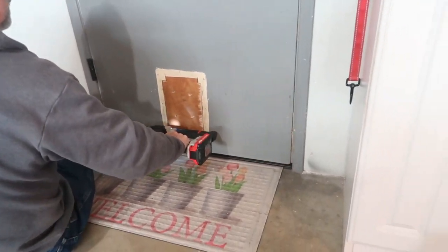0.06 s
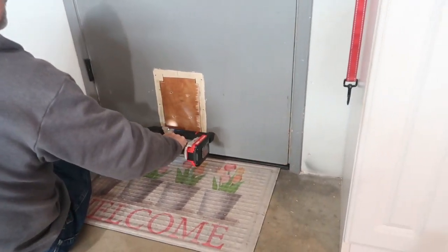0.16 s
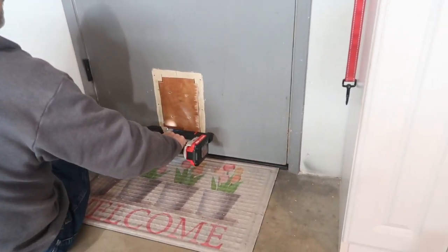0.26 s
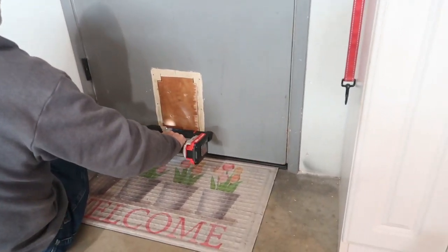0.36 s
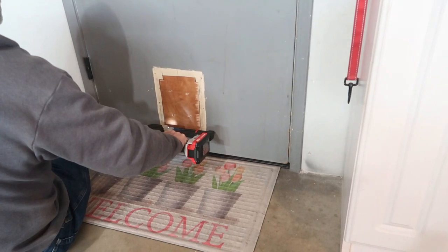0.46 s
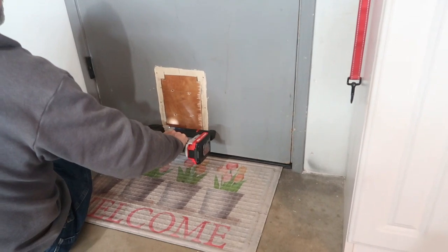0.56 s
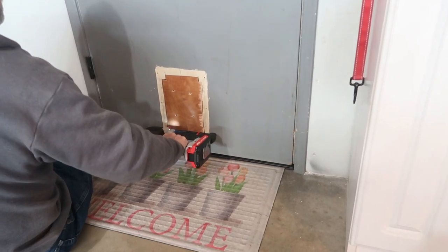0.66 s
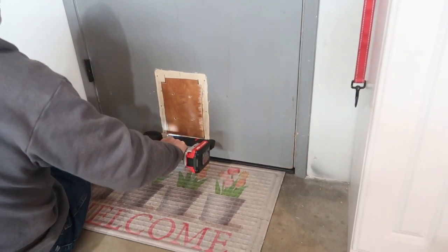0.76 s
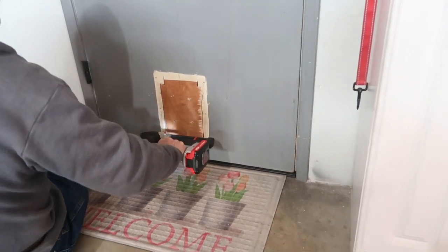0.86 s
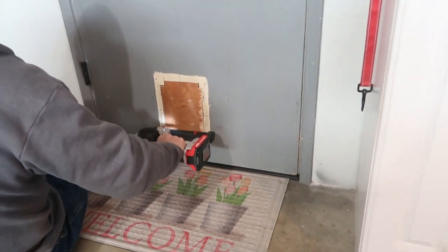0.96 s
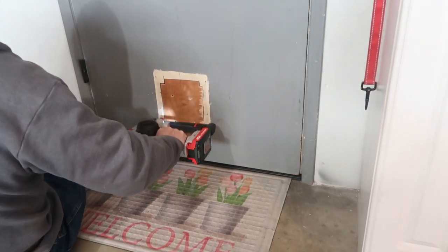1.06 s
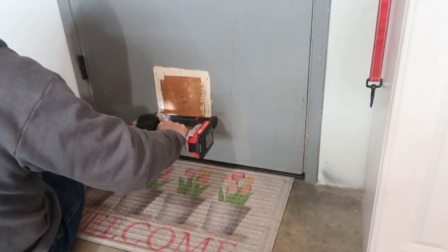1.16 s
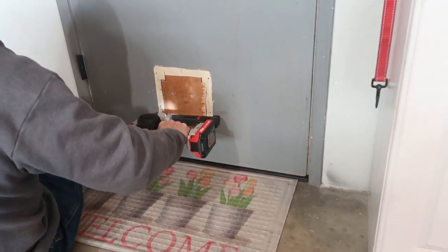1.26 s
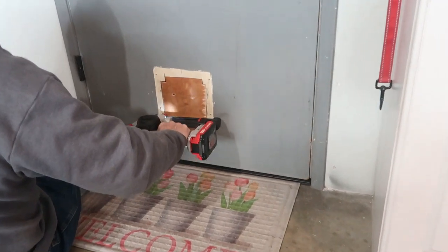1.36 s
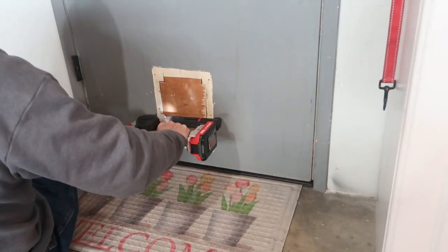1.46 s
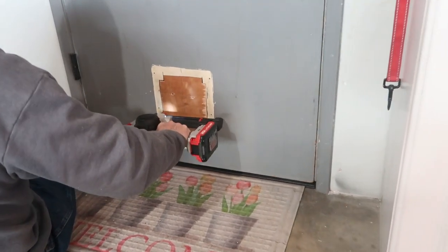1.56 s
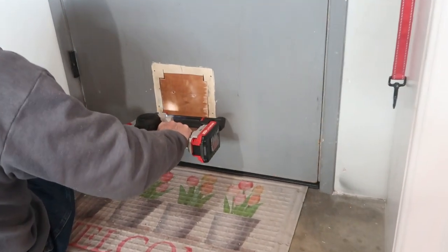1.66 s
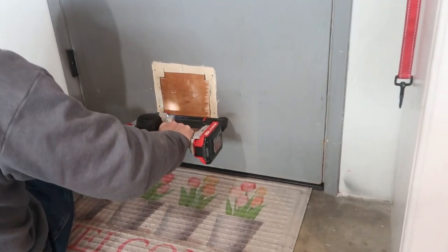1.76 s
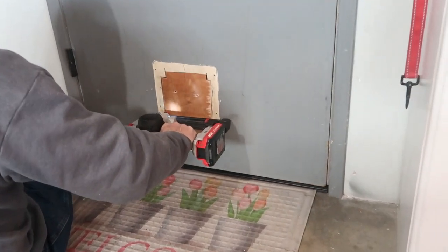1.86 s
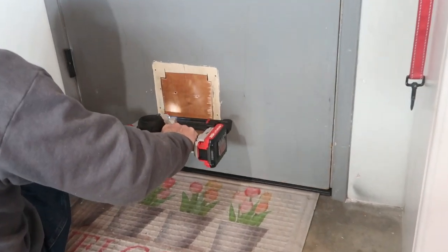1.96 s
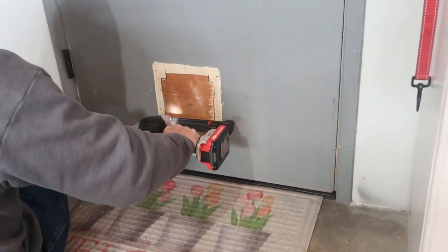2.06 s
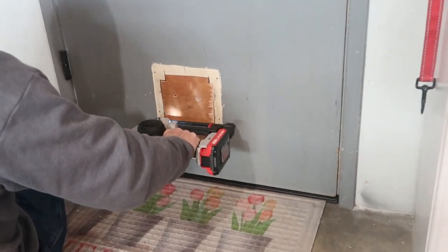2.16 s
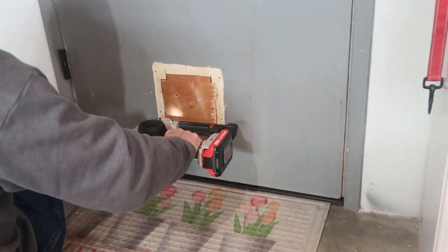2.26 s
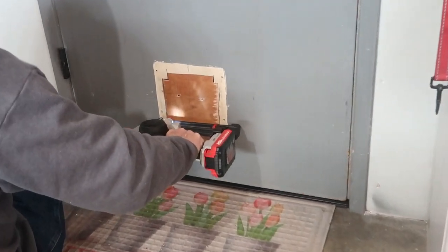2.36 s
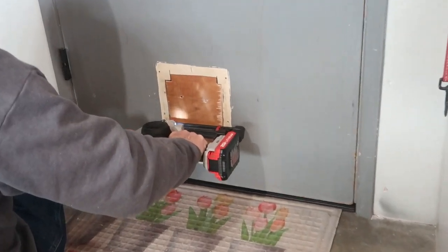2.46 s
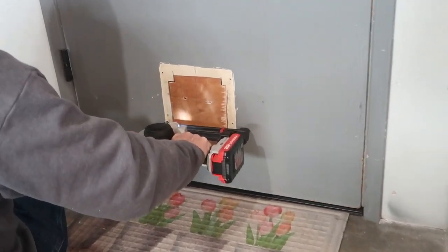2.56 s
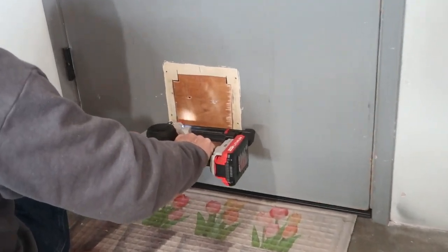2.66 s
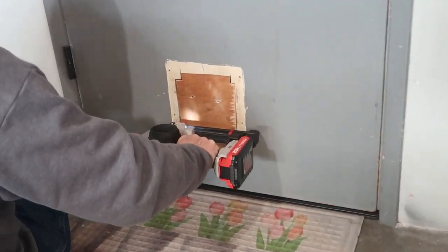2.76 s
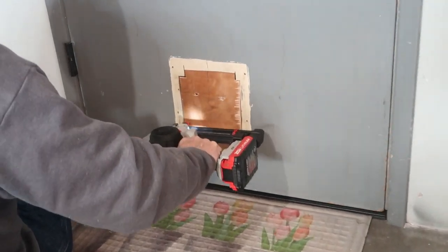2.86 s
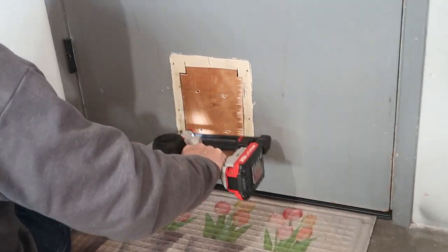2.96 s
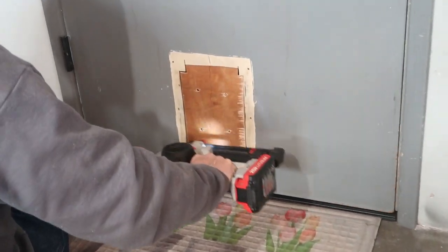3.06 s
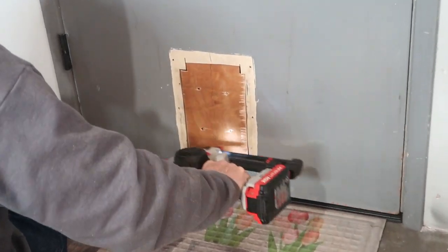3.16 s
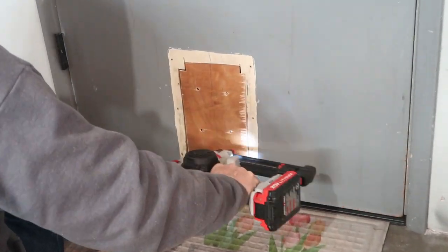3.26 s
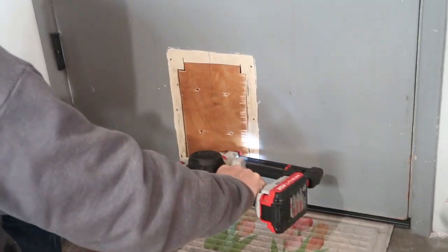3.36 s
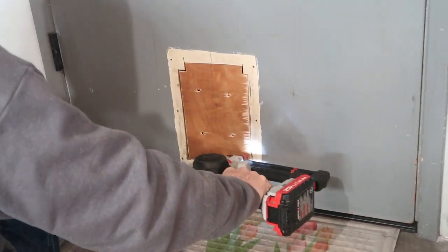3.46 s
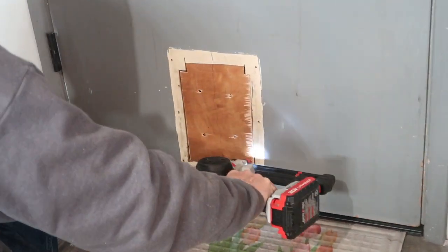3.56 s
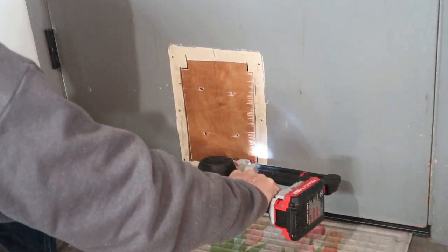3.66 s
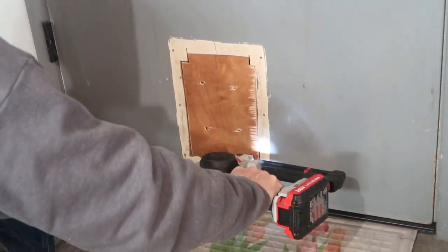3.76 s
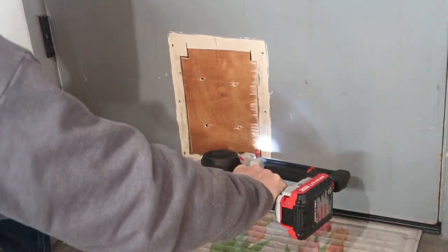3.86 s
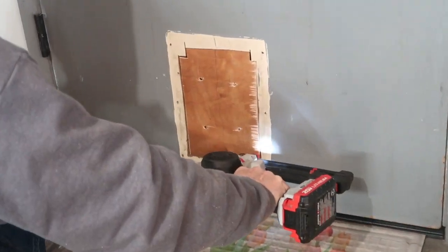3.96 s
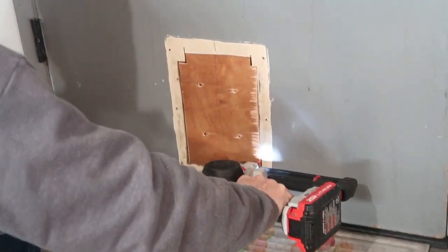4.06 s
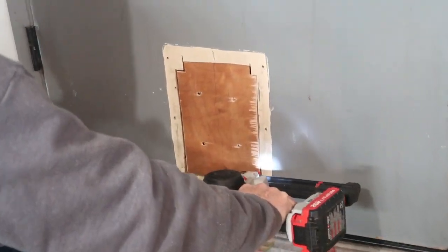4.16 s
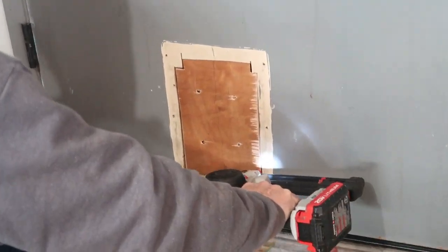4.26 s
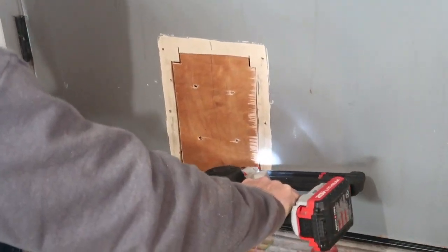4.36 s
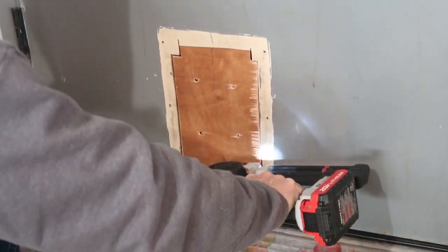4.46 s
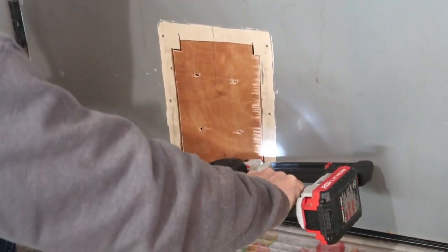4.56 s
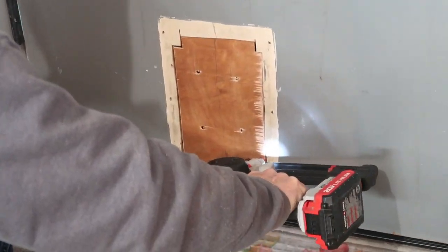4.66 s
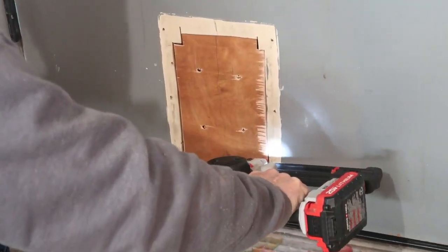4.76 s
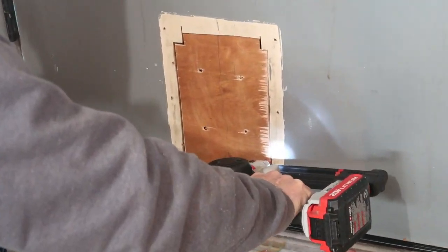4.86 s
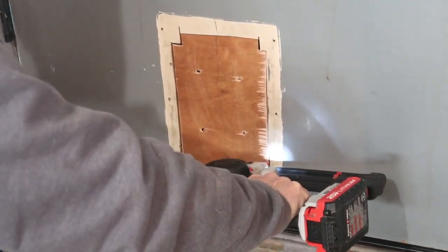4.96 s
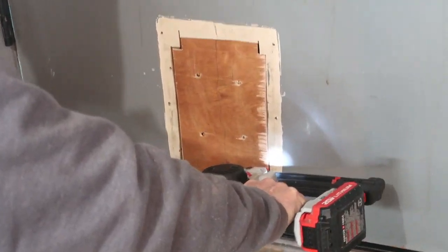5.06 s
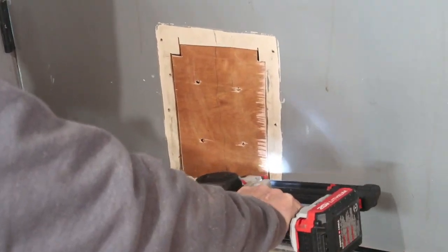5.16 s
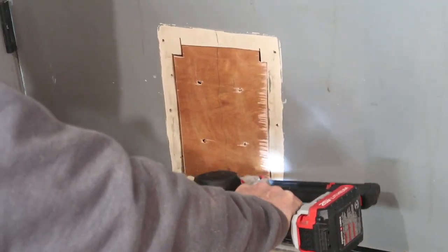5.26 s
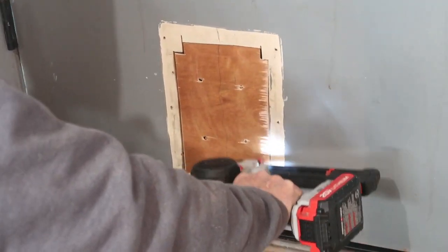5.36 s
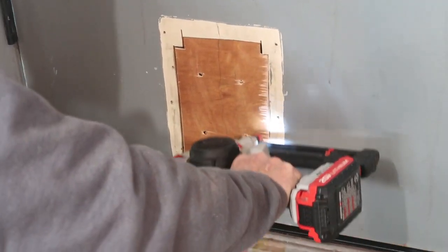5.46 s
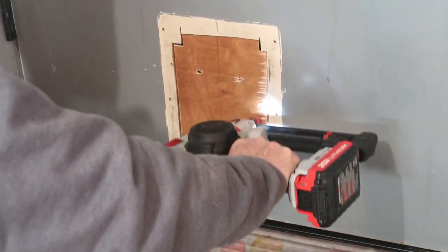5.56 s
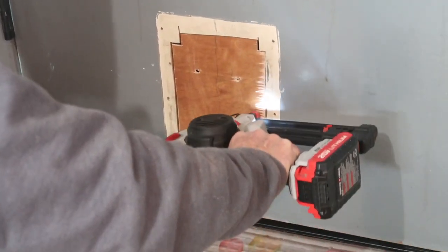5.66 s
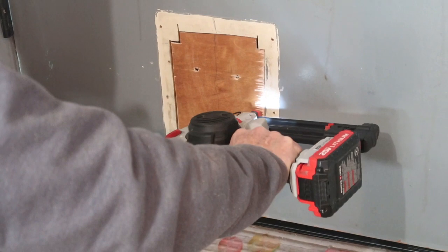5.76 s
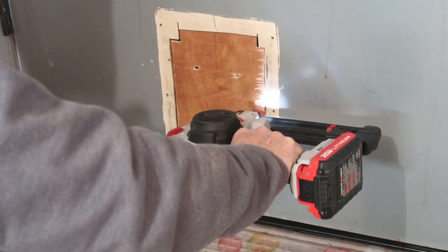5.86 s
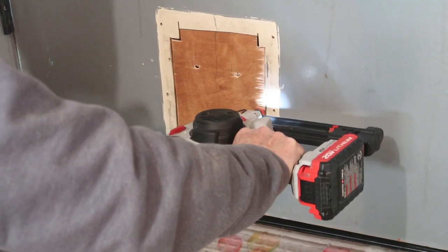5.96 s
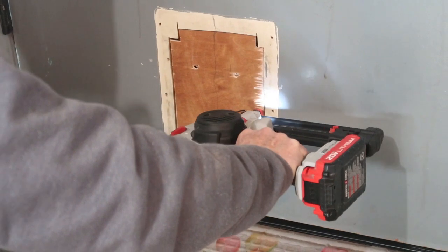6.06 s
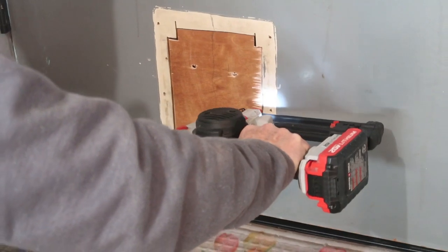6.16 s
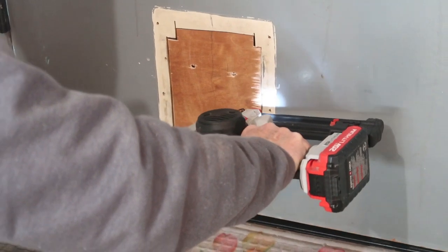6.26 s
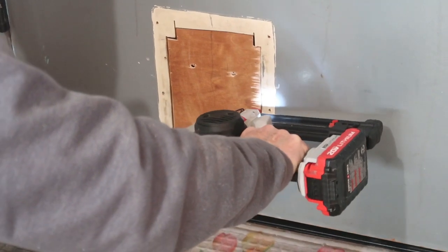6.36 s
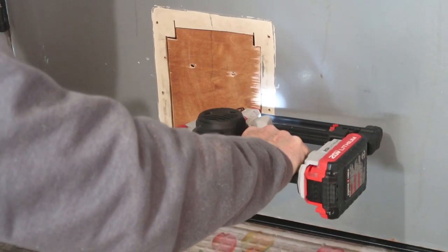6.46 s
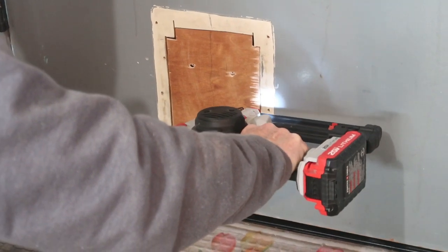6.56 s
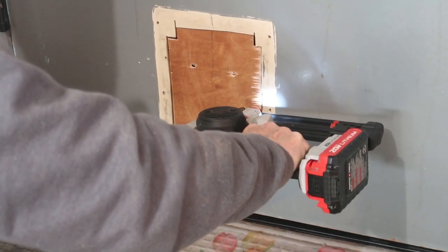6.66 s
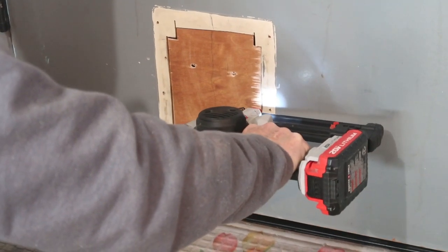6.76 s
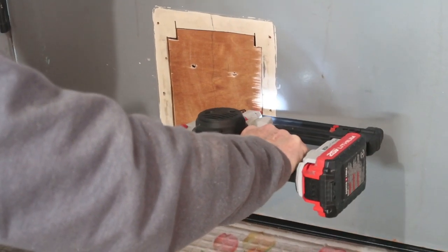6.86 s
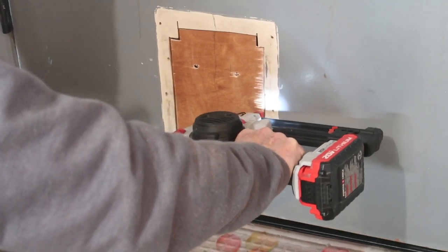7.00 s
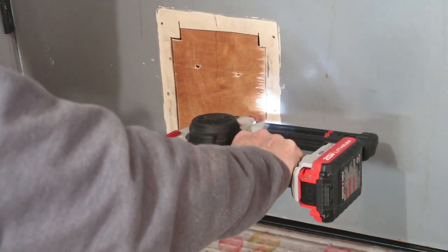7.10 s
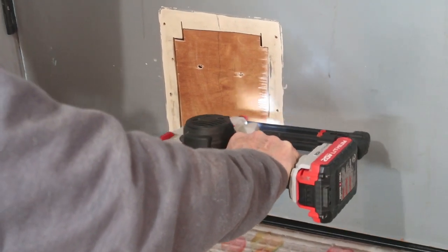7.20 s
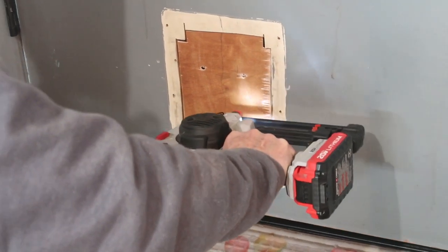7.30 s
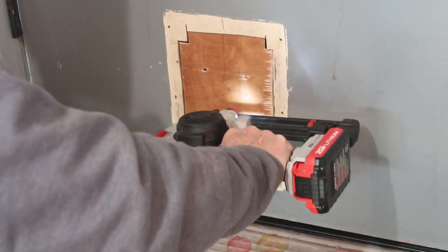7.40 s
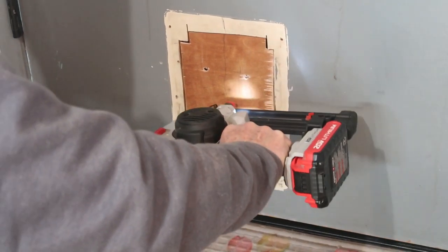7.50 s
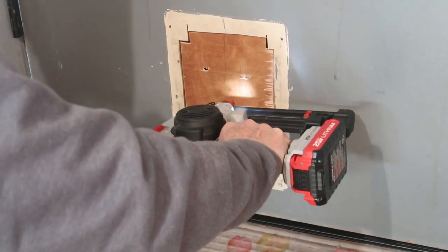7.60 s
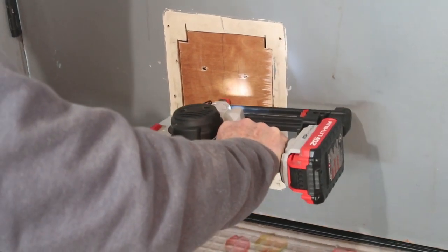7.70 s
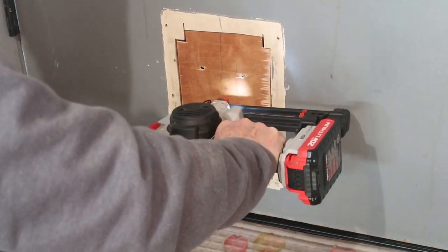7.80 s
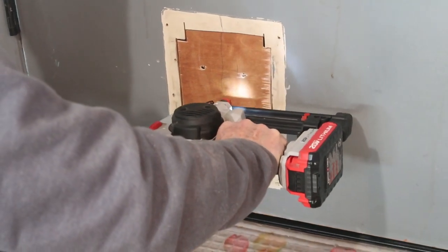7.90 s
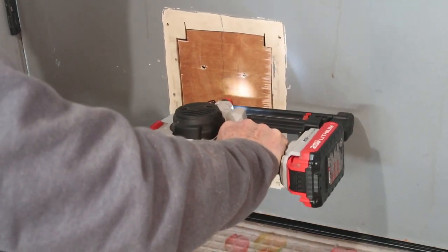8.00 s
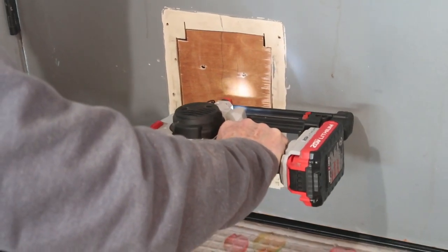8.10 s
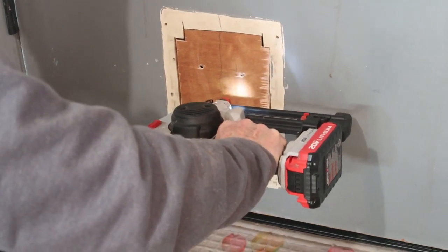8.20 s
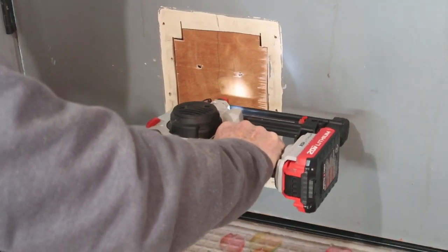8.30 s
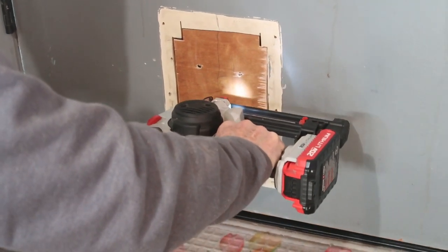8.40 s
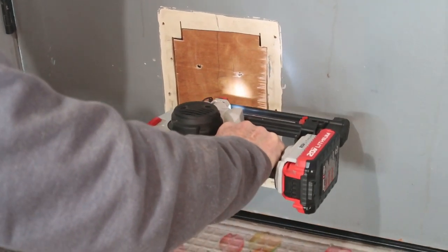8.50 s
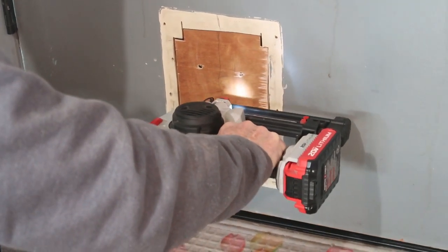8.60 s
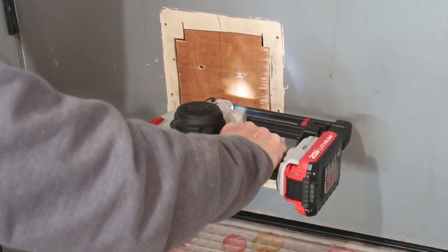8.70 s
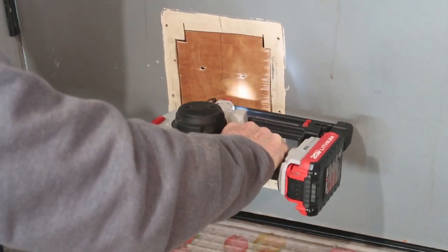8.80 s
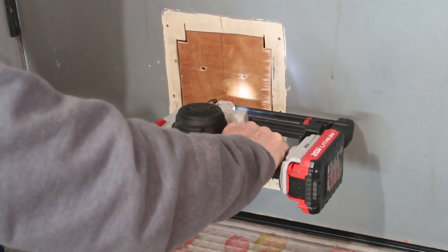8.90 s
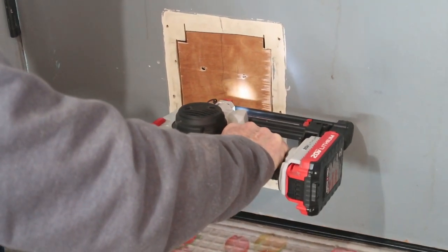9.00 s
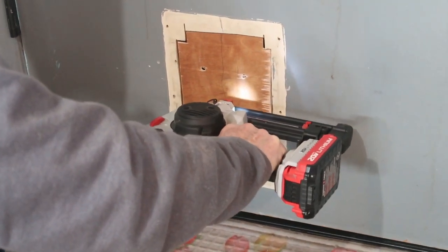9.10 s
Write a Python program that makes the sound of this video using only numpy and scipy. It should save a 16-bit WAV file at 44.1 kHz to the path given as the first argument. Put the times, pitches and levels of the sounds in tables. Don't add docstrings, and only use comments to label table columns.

```python
import sys
import numpy as np
from scipy import signal
from scipy.fft import rfft, irfft, next_fast_len
from scipy.io import wavfile

SR = 44100
rng = np.random.default_rng(int(sys.argv[2]) if len(sys.argv) > 2 else 0)


def persist_wave(psi):
    counts = np.round(np.clip(psi, -1, 1) * 32767).astype(np.int16)
    wavfile.write(sys.argv[1], SR, np.atleast_2d(counts).T)


def magnitude_from_level(level_db):
    exponent = np.asarray(level_db, float) / 20
    return 10 ** exponent


N = 403074


def evened(x):
    return x / np.sqrt(np.mean(x ** 2) + 1e-20)


def read(points, hz):
    f, value = np.transpose(points)[:2]
    return np.interp(np.log(hz + 1), np.log(f + 1), value)


def add(mix, s, sound):
    part = mix[max(round(s * SR), 0):][:len(sound)]
    part += sound[:len(part)]


def hiss(size, colour):
    fast = next_fast_len(size, True)
    gain = magnitude_from_level(read(colour, np.fft.rfftfreq(fast, 1 / SR)))
    return evened(irfft(rfft(rng.standard_normal(size), fast) * gain, fast)[:size])


def resonate(x, hz, width):
    turn = np.exp(2j * np.pi * np.cumsum(hz * np.ones(len(x))) / SR)
    r = np.exp(-np.pi * width / SR)
    return 2 * (turn * signal.lfilter([1 - r], [1, -r], x / turn)).real


def steep(x, hz, width):
    return evened(resonate(resonate(x, hz, width), hz, width))


def columns(rows):
    s, *cols = np.transpose(rows)
    t = np.arange(s[0], s[-1], 1 / SR)
    return t, signal.windows.tukey(len(t), .06), [np.interp(t, s, c) for c in cols]


def burst(t, at, rise, fall):
    return np.exp(np.where(t < at, (t - at) / rise, (at - t) / fall))


# (frequency [Hz], level [dB per Hz])
AIR_COLOUR = [(12, -36), (20, -7), (59, 3), (109, -5), (196, -4), (392, -5.5), (579, -13.5), (832, -8.5),
              (1070, -15), (2750, -22.5), (3630, -28), (7290, -37.5), (15400, -58.5)]


def garage_air():
    return magnitude_from_level(-62) * hiss(N, AIR_COLOUR)


# (frequency [Hz], t60 [s])
GARAGE_DECAY = [(100, 0.29), (300, 0.23), (1000, 0.29), (3000, .26), (6000, 0.31), (12000, 0.19)]


def garage(x):
    taps, at = np.zeros(SR), np.arange(260, SR - 20, 20)
    taps[at + rng.integers(0, 20, len(at))] = rng.choice([-1., 1.], len(at))
    hz, t, z = signal.stft(taps, SR, nperseg=256)
    decay = magnitude_from_level(-60 * t / read(GARAGE_DECAY, hz)[:, None])
    tail = signal.istft(z * decay, SR, nperseg=256)[1]
    return signal.fftconvolve(x, tail / np.linalg.norm(tail))[:N]


# (time [s], push [dB])
PUSH = [(0, -38), (.17, -57.5), (.7, -52), (.95, -76), (1.45, -75.5), (2.05, -50), (2.7, -47), (3.0, -69),
        (3.5, -64.5), (4.15, -48), (5.0, -45.5), (5.3, -68.5), (5.9, -63.5), (6.25, -53), (6.95, -53.5),
        (7.35, -69), (8.3, -53.5), (9.2, -38)]


def handling():
    t, _, (push_db,) = columns(PUSH)
    size, firm_db = len(t), push_db + 55
    lumps = magnitude_from_level(0.98 * hiss(size, [(1, 1), (30, -18.5), (60, -45), (20000, -89.5)]))
    rumble = hiss(size, [(12, -30), (28, 8.5), (60, 9.5), (140, 6.0), (220, -9), (20000, -84.5)])
    rub = hiss(size, [(90, -36), (180, -3), (420, -2), (520, -12.0), (900, -10), (1600, -30), (20000, -100)])
    rustle = hiss(size, [(700, -51), (1300, 2.5), (3000, -7.5), (4500, -13.0), (9000, -23), (20000, -72)])
    rustle = rustle + 0.17 * steep(rustle, 3200, 45) + 0.06 * steep(rustle, 2800, 81)
    friction = magnitude_from_level(-57.0 + .65 * firm_db) * rub + magnitude_from_level(-66.5 + .7 * firm_db) * rustle
    return t[0], magnitude_from_level(-57 + firm_db) * rumble + lumps * friction


# (time [s], level [dB], pitch [Hz])
MOAN_CURVE = [
    (5.7, -80, 207),
    (5.854, -56, 203),
    (5.886, -62, 199),
    (5.944, -55, 206),
    (5.974, -59, 228),
    (6.05, -56, 230),
]


def moan():
    t, ends, (db, hz) = columns(MOAN_CURVE)
    return t[0], ends * magnitude_from_level(db) * steep(rng.standard_normal(len(t)), hz, 24.3)


# (time [s], level [dB], pitch factor [1])
SWITCH_CLICKS = [(.175, -63.5, 1.09), (0.2237, -55.5, 1.05), (1.2167, -64.5, 1.14), (2.0241, -52, 0.89),
                 (2.2888, -51.5, 1.12), (4.2259, -51, 0.78), (4.639, -49, 1.03), (6.2013, -53.5, .95),
                 (6.449, -52.5, 1.1), (7.811, -53, 1.1), (8.4106, -47, 0.77), (8.7107, -46, 1)]
# (frequency [Hz], width [Hz], level [dB])
SHELL_MODES = [(4170, 1200, 2), (5500, 4500, -2), (7870, 2500, -8.5), (10900, 3300, -15.5)]


def switch(s, db, pitch):
    t = np.arange(0, .08, 1 / SR) - .003
    white = rng.standard_normal(len(t))
    ring = sum(magnitude_from_level(m_db) * steep(white, hz * pitch, w) for hz, w, m_db in SHELL_MODES)
    snap = burst(t, .0015, .001, .003) + .35 * burst(t, .008, .003, .014)
    return s - .003, magnitude_from_level(db - 1.0) * ring * snap


# (time [s], click [dB], click pitch [Hz], wood knock [dB], door thud [dB])
TIP_SCUFFS = [(0.014, -23.5, 3620, -37.5, -38.5), (1.3502, -52.5, 2480, -45, -66),
              (1.3768, -63.5, 2060, -53, -69), (1.6127, -39, 2630, -44, -54), (1.6411, -39, 3860, -53, -61),
              (2.0546, -23.5, 3600, -31.5, -35), (2.8627, -33.5, 2530, -42, -55),
              (3.72, -43.5, 2980, -56, -62), (4.1586, -44, 2150, -54, -52), (4.2715, -34, 4000, -56, -59),
              (4.3202, -52.5, 2180, -43, -68), (6.1503, -53.5, 2420, -48, -48),
              (6.2325, -27.5, 3360, -55, -40), (6.348, -45.5, 2580, -51, -63.5),
              (7.0679, -32.5, 2660, -62, -65), (8.3167, -56, 2390, -41, -61),
              (8.3555, -55, 2850, -32.5, -40)]
NOSE_KNOCKS = [
    (1.5265, -39, 3700, -30.5, -43),
    (3.6606, -40.5, 2480, -49.5, -59),
    (3.9747, -37, 2440, -47, -55),
    (5.964, -45, 2780, -42, -63.5),
    (5.981, -38, 2580, -55, -65),
    (7.8019, -43.5, 2750, -27, -59),
    (7.8407, -26, 2900, -35.5, -54),
    (7.9963, -54, 2750, -49.5, -67.5),
    (8.435, -18, 3100, -25.5, -27.5),
]
SCUFF_SNAP_DB, KNOCK_SNAP_DB = -30.5, -14


def knock(s, click_db, click_hz, wood_db, thud_db, snap_db):
    t = np.arange(0, .25, 1 / SR) - .004
    white = rng.standard_normal(len(t))
    grit = hiss(len(t), [(400, 5.5), (800, 10.0), (3500, 2.5), (6000, -5.5), (9000, -48), (16000, -60)])
    snap = hiss(len(t), [(3500, -25), (6000, 0.5), (10000, -5.5), (14000, -9), (17000, -40)])
    clatter = burst(t, .0015, .0008, .003) + .4 * burst(t, .012, .006, .018)
    click = (evened(grit + 0.64 * steep(white, click_hz, 830)) + magnitude_from_level(snap_db) * snap) * clatter
    wood = np.sin(2 * np.pi * 315 * t) * burst(t, 0.0043, 0.0025, 0.0029)
    plywood = steep(white, 333, 120) + 0.59 * steep(white, 836, 320)
    wood = wood + 0.25 * plywood * burst(t, 0.0098, 0.0075, 0.037)
    thud = evened(steep(white, 60, 32) + steep(white, 108.6, 42)) * burst(t, .012, 0.01, 0.044)
    return s - .004, magnitude_from_level(click_db - 5.5) * click + magnitude_from_level(wood_db + 2.0) * wood + magnitude_from_level(thud_db + 2.5) * thud


# (whir [dB], flywheel ring [dB], brake after the crack [s])
COAST_DOWNS = [
    (-59.5, -65.5, 0.41),
    (-59, -67, .42),
    (-59.5, -65.5, 0.39),
    (-56, -64, 0.4),
]
# (frequency [Hz], level [dB per Hz])
COAST_SPECTRUM = [(180, -51), (300, -17), (342, -27), (492, -9), (936, 7.5), (1220, 0.5), (1590, 4.5),
                  (4790, -7), (5740, -13), (6340, -17), (8530, -20), (12500, -18), (15400, -49)]
# (frequency [Hz], width [Hz], level [dB])
FLYWHEEL_MODES = [(4730, 60, -1), (6340, 150, -1), (7230, 90, -5), (12350, 140, -10), (2840, 120, -4)]


def coast(nail_s, run_db, ring_db, brake_s):
    t = np.arange(0.079, .75, 1 / SR)
    shake_db = 9 * np.exp((t[0] - t) / 0.11)
    whir_db = run_db + shake_db - 79 * np.maximum(t - brake_s, 0)
    braked = np.maximum(t - brake_s + 0.047, 0)
    white = rng.standard_normal(len(t))
    ring = 0
    for hz, width, db in FLYWHEEL_MODES:
        brake_db = 127 * min(hz / 6340, 1) ** 1.7 * braked
        flutter_db = 2.8 * hiss(len(t), [(1, -2), (15, -1), (40, -40), (20000, -90)])
        ring = ring + magnitude_from_level(db - brake_db + flutter_db) * steep(white, hz, 1.4 * width)
    roar = magnitude_from_level(whir_db) * hiss(len(t), COAST_SPECTRUM)
    ends = signal.windows.tukey(len(t), .06)
    return nail_s + t[0], ends * (roar + magnitude_from_level(ring_db + .4 * shake_db - 2.5) * ring)


# (time from the crack [s], speed [turns per s])
SPIN_CURVE = [(-.39, 28), (-.31, 50), (-.26, 68), (-.2, 91), (-.16, 105), (-.12, 117), (-.08, 128),
              (0, 146)]
# (whir at full load [dB], wobble hum [dB], its second order [dB])
SPIN_UPS = [
    (-41, -40.5, -37.5),
    (-37, -37.5, -29),
    (-35, -31, -42),
    (-40.5, -41.5, -40.5),
    (-33.5, -33, -38),
]
# (frequency [Hz], level [dB per Hz])
ROAR_SPECTRUM = [(120, -42), (200, -11), (263, -4.5), (956, -5.5), (1260, -3.5), (1840, -9.5), (2170, -8),
                 (3480, -6), (6220, -16), (8950, -10.5), (13000, -19), (15400, -38)]
# (multiple of the speed [1], width [Hz], level over the whir [dB])
BELT_TEETH = [(7.1, 50, -17), (13.1, 70, -15), (14.1, 70, -6), (21.6, 80, -19), (27, 100, -16),
              (29, 90, -8), (43.2, 220, -19), (57.6, 320, -16), (72, 380, -13), (86, 450, -17)]
# (frequency [Hz], width [Hz], level over the whir [dB])
HOUSING_MODES = [(950, 200, -15), (1800, 150, -13), (2800, 200, -18), (4740, 160, -21), (7230, 140, -26)]


def spin_up(nail_s, full_db, hum_db, second_db):
    t = np.arange(-.39, .01, 1 / SR)
    size, speed = len(t), np.interp(t, *np.transpose(SPIN_CURVE))
    turn = 2 * np.pi * np.cumsum(speed) / SR
    octaves = np.log2(speed / 110)
    whir_db = full_db + np.where(octaves < 0, 6.5, 4) * octaves
    white = rng.standard_normal(size)

    roar = hiss(size, ROAR_SPECTRUM) * (1 + 0.2 * np.cos(turn))
    dull = signal.lfilter(*signal.butter(2, 3500, fs=SR), roar)
    flicker = magnitude_from_level(-1.5 + 2.0 * hiss(size, [(1, -12.5), (140, 0), (400, -4), (900, -40), (20000, -90.5)]))
    roar = dull + (roar - dull) * np.clip(speed / 105, 0, 1) ** 1.4 * flicker

    teeth = 0
    for k, width, db in BELT_TEETH:
        tone = .85 * (k < 35) * np.sin(k * turn)
        line = evened(steep(white, k * speed, width) + tone)
        teeth = teeth + magnitude_from_level(db) * (speed / 130) ** (k / 45) * line
    grip = magnitude_from_level(-1 - 7 * np.exp(t / .03) + 2.2 * hiss(size, [(1, 0), (25, 0), (50, -40), (20000, -90)]))
    shell = sum(magnitude_from_level(db + 4.0 + 0.2 * (hz > 4000)) * steep(white, hz, w) for hz, w, db in HOUSING_MODES)

    hum = magnitude_from_level(hum_db + 2.5) * (speed / 119) ** 2 / np.hypot(1, 2 * (speed - 119) / 26)
    hum = hum + magnitude_from_level(hum_db - 11.0) / (1 + (2 * (speed - 72) / 16) ** 2)
    second = magnitude_from_level(second_db) / (1 + (2 * (2 * speed - 307) / 30) ** 2)
    wobble = np.sqrt(2) * (hum * np.sin(turn) + second * np.sin(2 * turn))
    ends = signal.windows.tukey(size, .06) * np.clip((t - t[0]) / 0.031, 0, 1)
    return nail_s + t[0], ends * (magnitude_from_level(whir_db - 1.5) * (roar + teeth * grip + shell) + wobble)


# (frequency [Hz], level [dB], t60 [s])
DOOR_MODES = [(60.93, -22, .15), (126, 0, 0.11), (200, -17, 0.03), (289, 2.5, 0.053), (310, 5, 0.032),
              (366, 3.5, 0.077), (558.4, -7, 0.033), (628, -2, 0.17), (785, -6, 0.28), (1000, -2.5, 0.11),
              (1240, -6.5, 0.054), (1495, -5.5, 0.1)]


def door(blow, low_db):
    t = np.arange(len(blow)) / SR
    modes = 0
    for hz, db, t60 in DOOR_MODES:
        tone = np.sin(2 * np.pi * hz * rng.uniform(1.0, 1.03) * t)
        modes = modes + magnitude_from_level(db + low_db * (hz < 160) - 60 * t / t60) * tone
    return signal.fftconvolve(blow, modes)[:len(t)]


# (time [s], crack [dB], blade stroke [dB], door boom [dB], stroke length [s])
NAIL_SHOTS = [
    (0.609, 4.5, -20, -17.5, 0.009),
    (2.6785, 2.5, -15.5, -13, 0.009),
    (5.029, 4, -15, -11, 0.0095),
    (6.8401, 2.5, -17.5, -14.5, 0.009),
    (9.0979, 6, -14.5, -8, 0.009),
]
# (frequency [Hz], width [Hz], level [dB])
BLADE_MODES = [(1340, 260, 4.5), (2480, 310, 7), (3254, 510, -7), (4050, 110, -5), (6060, 870, -17),
               (10215, 6200, -14.5)]
# (frequency [Hz], level [dB per Hz])
CRACK_SPECTRUM = [(88, -35), (150, -6.5), (301, -4), (509, -6.5), (1000, -0.5), (1290, -16), (1570, -10.5),
                  (4640, -13.5), (6210, -26), (12000, -29.5), (15400, -43.5)]


def nail(s, crack_db, blade_db, boom_db, stroke):
    t = np.arange(0, .4, 1 / SR) - .01
    white = rng.standard_normal(len(t))
    rise = 1 + 8 * np.clip(t, 0, .01)
    screech = evened(sum(magnitude_from_level(db) * evened(resonate(white, hz * rise, w)) for hz, w, db in BLADE_MODES))
    slide = burst(t, .003, 0.0037, 0.0037) + .9 * burst(t, stroke + 0.0017, 0.00036, 0.0019)
    slide = slide + 0.07 * burst(t, -0.0011, 0.0024, 0.015)
    squeal = np.sin(2 * np.pi * np.cumsum(2450 + 60000 * np.clip(t, 0, .007)) / SR)
    squeal = squeal * burst(t, .004, .002, .003)
    blade = slide * screech + 0.65 * squeal

    crack = 0.64 * burst(t, stroke, 0.0026, 0.0045) + 0.19 * burst(t, stroke + .011, 0.00077, 0.014)
    crack = crack * hiss(len(t), CRACK_SPECTRUM)
    blow = 0.23 * burst(t, stroke - .003, 0.00043, 0.00087) - burst(t, stroke, 0.00019, 0.00033)
    blow = blow + 0.19 * burst(t, stroke + 0.012, 0.000055, 0.00013)
    boom = door(blow / 30, -20.5 - boom_db)
    fizz = hiss(len(t), [(3000, -30), (7000, 0.5), (12000, -1.5), (15000, -15.5)])
    fizz = fizz * burst(t, 0.036, .01, 0.063)
    shot = magnitude_from_level(blade_db + 10.0) * blade + magnitude_from_level(crack_db - 2.5) * crack
    return s - .01, shot + magnitude_from_level(boom_db + 3) * boom + magnitude_from_level(crack_db - 48.5) * fizz


def ports(x, apart):
    hz = np.fft.rfftfreq(8192, 1 / SR)
    scatter = rfft(rng.standard_normal(8192) * np.exp(-np.arange(8192) / 1100.))
    apart = magnitude_from_level(read(apart, hz)) * (.6j + 0.62 * scatter / abs(scatter))
    side = signal.fftconvolve(x, np.roll(irfft(apart), 256))[256:N + 256]
    return np.array([x + side, x - side])


# (frequency [Hz], side minus mid [dB])
NEAR_SPREAD = [(60, -33.5), (500, -29), (1000, -24), (2000, -26.5), (4000, -10), (8000, -0.5),
               (15000, -1.5)]
AIR_SPREAD = [(60, -20), (150, -14.5), (380, -8.5), (950, -9), (2380, -5.5), (5970, -0.5), (15000, 5)]


def scene():
    hits, tool, air = np.zeros(N), np.zeros(N), garage_air()
    add(air, *handling())
    add(air, *moan())
    for row in SWITCH_CLICKS:
        add(hits, *switch(*row))
    for row in TIP_SCUFFS:
        add(hits, *knock(*row, SCUFF_SNAP_DB))
    for row in NOSE_KNOCKS:
        add(hits, *knock(*row, KNOCK_SNAP_DB))
    for shot, run in zip(NAIL_SHOTS, COAST_DOWNS):
        add(air, *coast(shot[0], *run))
    for shot, whir in zip(NAIL_SHOTS, SPIN_UPS):
        add(tool, *spin_up(shot[0], *whir))
        add(hits, *nail(*shot))
    hits = signal.sosfilt(signal.butter(2, 55, "high", fs=SR, output="sos"), hits)
    near = tool + hits + magnitude_from_level(-11.5) * garage(hits)
    return ports(near, NEAR_SPREAD) + ports(air, AIR_SPREAD)


def low_pass(x):
    return signal.sosfilt(signal.butter(12, 15590, fs=SR, output="sos"), x)


def record(dry):
    knee = 12.0
    flat = dry / (1 + abs(dry) ** knee) ** (1 / knee)
    flat = signal.oaconvolve(flat, signal.firwin(61, 14700, fs=SR)[None], "same")
    return low_pass(np.clip(flat, -1, 1))


dry = scene()
out = record(dry)
persist_wave(out)
```